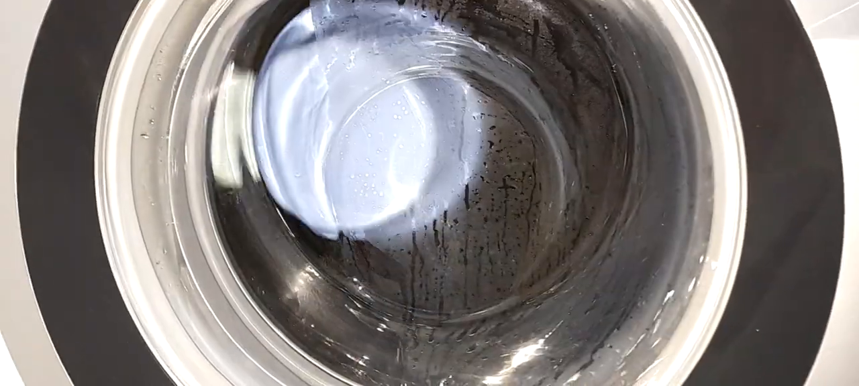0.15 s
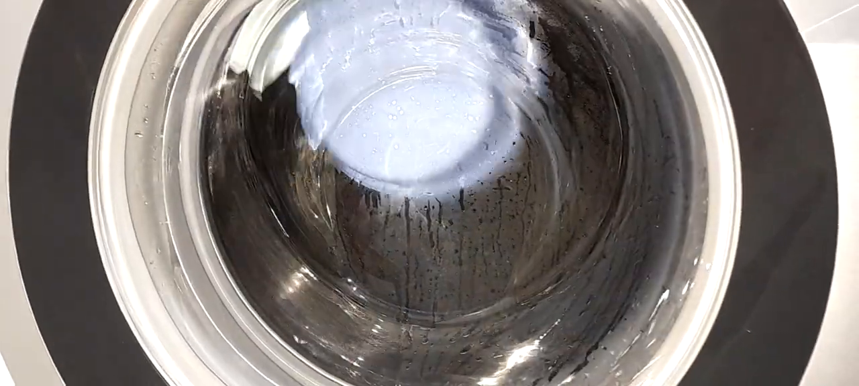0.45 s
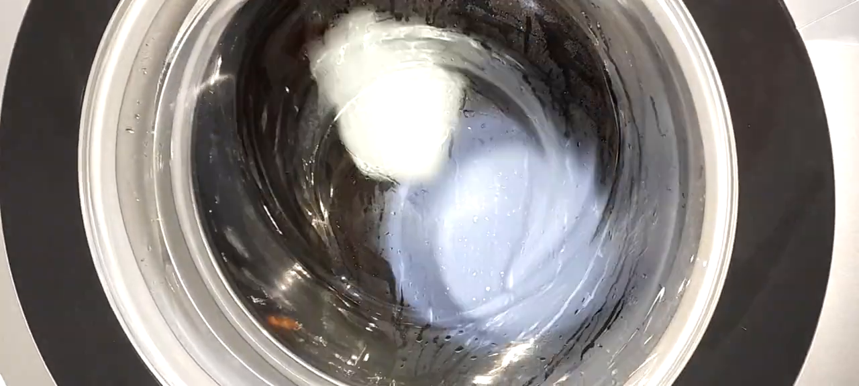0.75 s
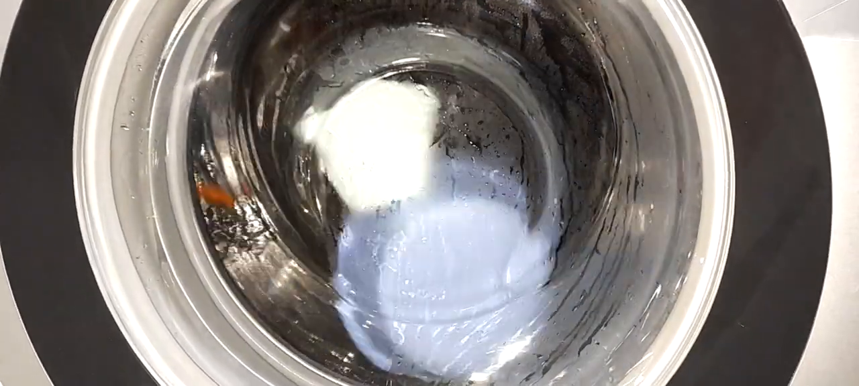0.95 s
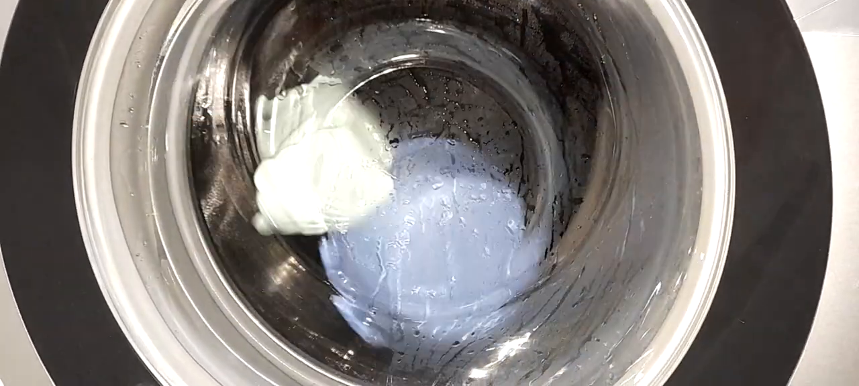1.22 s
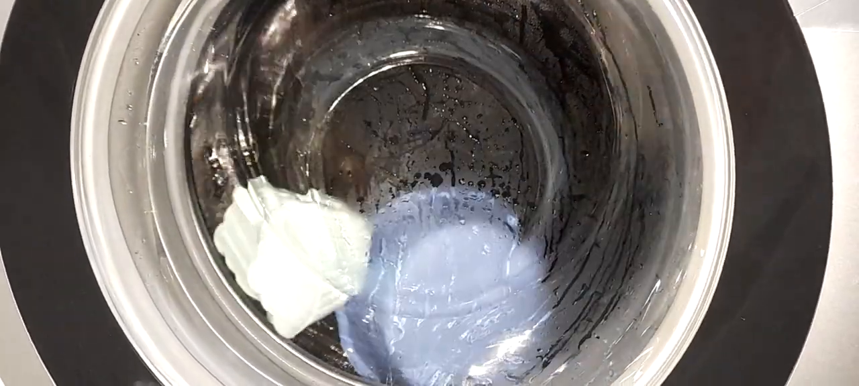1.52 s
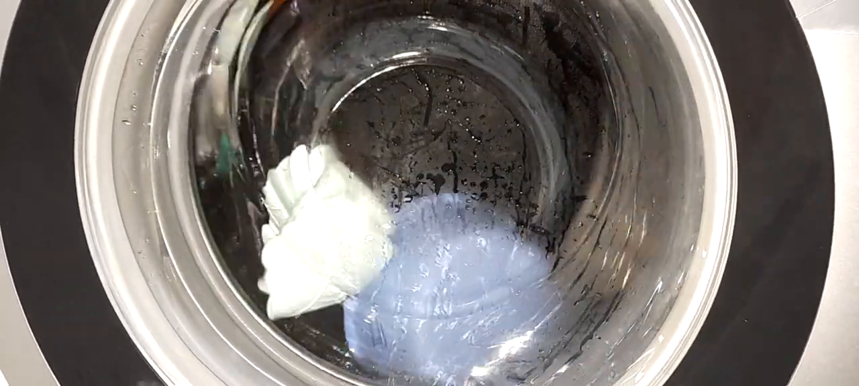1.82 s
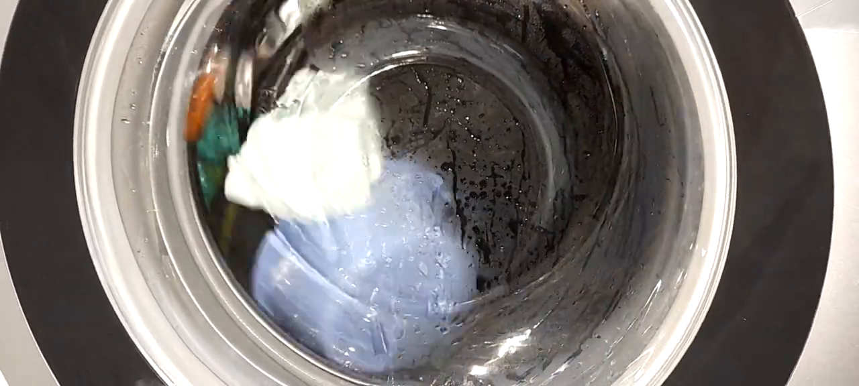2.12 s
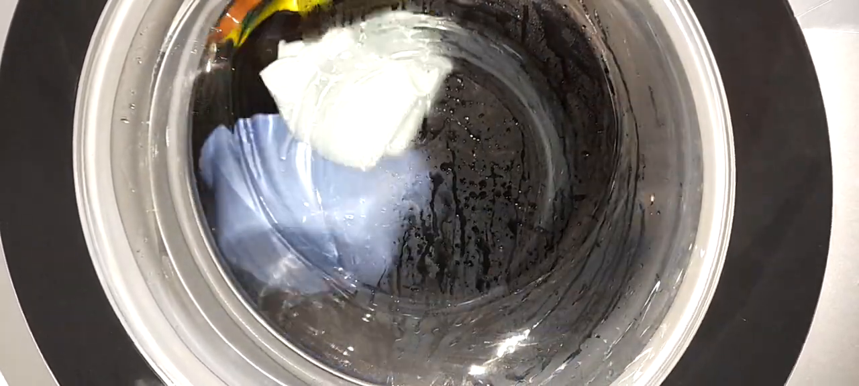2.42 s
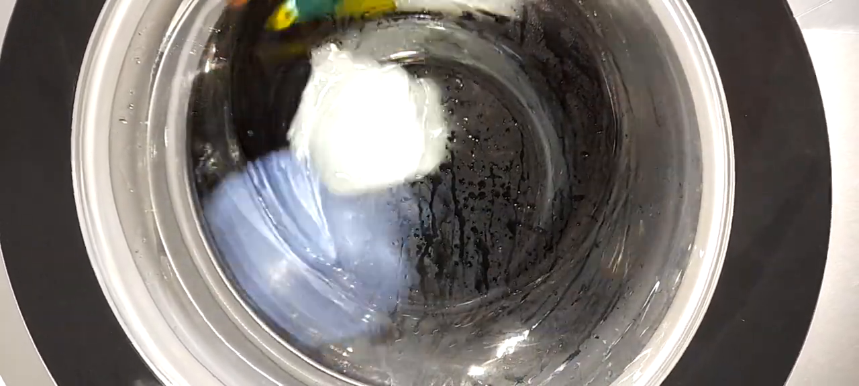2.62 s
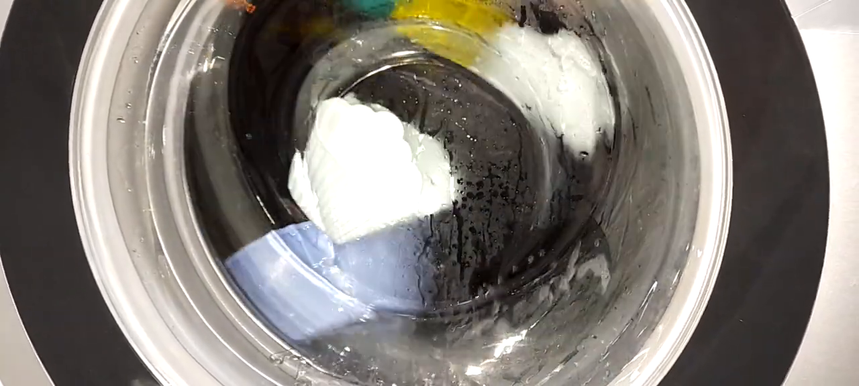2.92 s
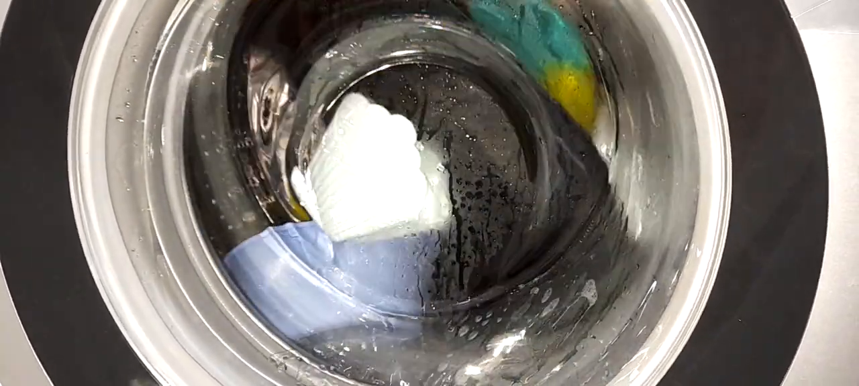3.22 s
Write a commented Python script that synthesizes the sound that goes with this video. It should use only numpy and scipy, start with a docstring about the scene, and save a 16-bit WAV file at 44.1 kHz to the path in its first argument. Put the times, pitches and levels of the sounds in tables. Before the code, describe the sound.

A front-loading washing machine drum turns a heavy wet load, rumbling unevenly with low thumps, wet slaps and sharp hard knocks; small ticks and one short squeak follow, heard close to the door in a small hard room.

```python
"""A washing machine drum turns slowly with a hard, wet load, heard close to the door in a small hard room.
Throughout, the rolling load drives panels and drum as shaped noise, with faint motor hiss and a thin whine.
From the start, bumps ring decaying sines and noise; from 0.13 s small pieces tick as clicks on short modes;
from 0.22 s hard pieces knock as bursts of noise. At 2.05 s a blow sets a metal part ringing; at 2.25 s wet
rubbing squeaks, as overtones on a shaky pitch. The drum reaches the left microphone port first."""
import sys
import numpy as np
from scipy import signal
from scipy.fft import rfft, irfft, next_fast_len
from scipy.io import wavfile
from scipy.ndimage import map_coordinates

SR = 44100
rng = np.random.default_rng(int(sys.argv[2]) if len(sys.argv) > 2 else 0)


def to_wav(sig):
    """Store sig (one row per channel, or 1-D mono) as 16-bit WAV at the path in sys.argv[1].

    Samples outside -1..1 are clipped; the rate is SR.
    """
    pcm = np.clip(np.atleast_2d(sig), -1, 1) * 32767
    pcm = np.round(pcm).astype(np.int16)
    wavfile.write(sys.argv[1], SR, pcm.T)  # frames by channels


N = 147735

# resonances of the drum's body: (centre [Hz], width [Hz], relative level [dB])
DRUM_BODY = [(267, 41.6, 1), (296, 32.2, 4), (341.7, 38.4, -1.5), (455.5, 21.2, 1.5), (524.7, 30, -2.5),
             (708, 110, -9.5)]


def amp(db):
    """Level definition: decibels to amplitude gain."""
    return 10 ** (np.asarray(db) / 20)


def along(points, hz):
    """Logarithmic frequency scale: interpolates (frequency [Hz], value) points on it."""
    f, v = np.transpose(points)
    return np.interp(np.log(hz + 1), np.log(f + 1), v)


def wobble(rate):
    """Band-limited random modulation: a smooth curve through `rate` random knots a second."""
    knots = rng.standard_normal(int(N * rate / SR) + 4)
    return map_coordinates(knots, [np.arange(N) * rate / SR])


def filtered(x, response):
    """Convolution theorem: filtering is a product of spectrum and complex response."""
    m = next_fast_len(N + SR // 2)
    spectrum = rfft(x, m) * response(np.fft.rfftfreq(m, 1 / SR))
    return irfft(spectrum, m)[..., :N]


def resonances(peaks):
    """Modal superposition: damped second-order resonators, summed with alternating sign."""
    def response(f):
        total = 0
        for k, (centre, width, db) in enumerate(peaks):
            mode = 1j * f * width / (centre * centre - f * f + 1j * f * width)
            total = total + (-1) ** k * amp(db) * mode
        return total
    return response


def spectrum_of(points):
    """Spectral envelope: a gain response through (frequency [Hz], relative level [dB per Hz]) points."""
    return lambda f: amp(along(points, f))


def through(envelope, response):
    """Partial coherence: mid and side noise share the power, so left and right are only partly alike."""
    # left-right likeness of the noise: (frequency [Hz], correlation [1])
    likeness = [(100, 0.89), (300, 1), (700, 1), (2000, 0.22), (8000, 0.18)]

    def mid_side(f):
        angle = np.arccos(np.clip(along(likeness, f), 0, 1)) / 2
        return response(f) * [np.cos(angle), np.sin(angle)]

    # the response is scaled to rms 1, so that the envelope alone sets the level
    gain = np.sqrt(np.mean(np.abs(response(np.linspace(0, SR / 2, SR // 2))) ** 2))
    mid, side = filtered(envelope * rng.standard_normal((2, N)), mid_side)
    return np.array([mid + side, mid - side]) / gain


def bursts(times, levels_db, t60s, attack_s):
    """Exponential decay: contacts rise fast and fall evenly in dB; overlapping ones add in power."""
    power, t = np.zeros(N + SR), np.arange(SR // 2) / SR
    for s, db, t60 in zip(times, levels_db, t60s):
        envelope = amp(db - 60 * t / max(t60, .003)) * (1 - np.exp(-t / attack_s))
        power[round(s * SR):][:len(t)] += envelope ** 2
    return np.sqrt(power[:N])


def rings(times, levels_db, modes):
    """Free vibration: every blow starts the damped modes anew, and each flutters as it dies."""
    flutter_share, flutter_rate, rise_s = .8, 350, .0006  # share [1], knots per s, swell of a ring [s]
    out, t = np.zeros(N + SR), np.arange(SR // 3) / SR
    for hz, level, t60 in modes:
        flutter = 1 + flutter_share * np.tanh(wobble(flutter_rate))
        for s, db in zip(times, levels_db):
            start = round(s * SR)
            decay = amp(db + level - 60 * t / t60) * np.tanh(t / rise_s)
            tone = decay * np.sin(2 * np.pi * hz * t)
            out[start:][:len(t)] += tone * np.resize(flutter[start:], len(t))
    return out[:N]


def thuds(times, levels_db, pitches_hz, t60s, attack_s):
    """Local resonance: each soft blow rings at the pitch of the spot that it hits."""
    out, t = np.zeros(N + SR), np.arange(SR // 2) / SR
    for s, db, hz, t60 in zip(times, levels_db, pitches_hz, t60s):
        envelope = amp(db - 60 * t / t60) * (1 - np.exp(-t / attack_s))
        out[round(s * SR):][:len(t)] += envelope * np.sin(2 * np.pi * hz * t)
    return out[:N]


def room(x):
    """Diffuse reverberation: convolution with noise tails in which each frequency dies at its own speed."""
    # reverberation time of the small hard room: (frequency [Hz], t60 [s])
    reverberation = [(100, 0.49), (1500, 0.21), (14000, 0.14)]
    # reverberant over direct sound, before the gain of each source: (frequency [Hz], level [dB])
    wetness = [(100, -22.5), (500, -6), (2000, -1.5), (8000, -3.5)]
    out, step = np.zeros((2, N + 2 * SR)), SR // 10
    # a new tail fades in every tenth of a second; squared, the overlapping fades add up to 1
    fade = np.sin(np.pi * np.arange(2 * step) / (2 * step))
    x = np.pad(x, (step, 2 * step))
    for start in range(0, N + step, step):
        hz, t, z = signal.stft(rng.standard_normal((2, SR // 3)), SR, nperseg=256)
        decay = amp(-60 * t / along(reverberation, hz)[:, None])
        decay = decay / np.sqrt(np.sum(decay ** 2, axis=1, keepdims=True) * 128)
        shape = decay * amp(along(wetness, hz))[:, None]
        tail = signal.istft(z * shape, SR, nperseg=256)[1]
        wet = signal.fftconvolve(fade * x[None, start:start + 2 * step], tail, axes=1)
        out[:, start + 90:][:, :wet.shape[1]] += wet  # 90 samples after the direct sound
    return out[:, step:step + N]


def whine():
    """Tonal radiation of the motor drive: thin sines with slow random modulation of level and phase."""
    # (frequency [Hz], mean level [dB])
    drive_tones = [(14300, -82)]
    t, out = np.arange(N) / SR, 0
    for hz, db in drive_tones:
        out = out + amp(db + 2 * wobble(8)) * np.sin(2 * np.pi * hz * t + 1.5 * wobble(40))
    return out


def rolling():
    """Forced vibration: the rolling load drives panels, drum and rattle as noise; the motor hisses too."""
    # mean levels: (time [s], boom [dB], drum's body [dB], rattle [dB], hiss [dB])
    roll_levels = [(0.0, -34, -41, -40, -56), (0.23, -39, -26, -42, -58), (0.41, -34.5, -36, -33.5, -48.5),
                   (0.56, -43.5, -32.5, -34.5, -50), (0.7, -38, -33, -40, -58.5),
                   (0.85, -45, -47.5, -47.5, -56.5), (1.09, -40.5, -32, -42.5, -61),
                   (1.21, -41, -28.5, -28.5, -48), (1.33, -36, -31.5, -36, -51.5),
                   (1.5, -28.5, -31, -37.5, -50), (1.63, -44, -35, -39, -60),
                   (1.84, -39, -39, -39.5, -55.5), (2.02, -36.5, -30.5, -45, -57.5),
                   (2.11, -46, -34.5, -33.5, -45.5), (2.22, -44.5, -37.5, -43.5, -59),
                   (2.342, -46, -44, -46, -55), (2.52, -37, -42, -43.5, -60),
                   (2.75, -30.5, -28, -36.5, -54), (2.83, -31, -32.5, -44, -56.5),
                   (2.99, -38, -38, -46.5, -63.5), (3.18, -44, -40, -49.5, -63),
                   (3.35, -37, -18.5, -35, -55.5)]
    # cabinet panels: (centre [Hz], width [Hz], relative level [dB])
    panels = [(74, 14.3, -1), (111, 11, -2.5), (132.8, 5.5, 1.5), (183.4, 5.9, -3.5)]
    # spectrum of the rattle: (frequency [Hz], relative level [dB per Hz])
    rattle_shape = [(320, -30), (550, -4), (699, -3.5), (1480, -9.5), (1580, -12), (2230, -15.5),
                    (3500, -37), (4550, -60), (7700, -120)]
    # spectrum of the hiss: (frequency [Hz], relative level [dB per Hz])
    hiss_shape = [(1470, -21), (2500, -26.5), (2640, -2), (3370, -11), (3730, -9), (5870, -15),
                  (6530, -13.5), (8160, -26), (13900, -23.5), (15700, -41)]
    s, boom_db, body_db, rattle_db, hiss_db = np.transpose(roll_levels)

    def uneven(db, depth_db, rate):
        return amp(np.interp(np.arange(N) / SR, s, db) + depth_db * np.tanh(wobble(rate)))

    boom = through(uneven(boom_db, 4, 25.43), resonances(panels))
    body = through(uneven(body_db, 1.5, 40), resonances(DRUM_BODY))
    rattle = through(uneven(rattle_db, 2.9, 90), spectrum_of(rattle_shape))
    hiss = through(uneven(hiss_db, 1, 66), spectrum_of(hiss_shape))
    return boom + body + rattle + hiss


def squeak():
    """Friction-excited vibration: wet rubbing sounds smeared overtones and sets resonances hissing."""
    # path of the squeak: (time [s], mean pitch [Hz], level [dB])
    squeak_path = [(2.246, 2035, -63), (2.252, 1862, -44), (2.265, 2014, -60), (2.276, 2198, -41),
                   (2.287, 1970, -58.5), (2.308, 1950, -44), (2.33, 2125, -46), (2.338, 2305, -53),
                   (2.349, 2520, -46), (2.358, 2130, -49), (2.369, 1900, -65)]
    # overtones: (multiple of the pitch [1], relative level [dB])
    overtones = [(1, 1), (2, -1), (3, -9)]
    # resonances that the rubbing excites, each applied twice: (centre [Hz], width [Hz], level [dB])
    rubbed_modes = [(1856, 60, 1.5), (2234, 97, 3), (5730, 98, -4), (6500, 340, -6), (11200, 900, -15)]
    pitch_scatter, smear_share, smear_rate = .02, .8, 400  # share [1], share [1], knots per s
    s, hz, db = np.transpose(squeak_path)
    t = np.arange(N) / SR
    pitch = np.interp(t, s, hz) * (1 + pitch_scatter * wobble(250))
    turns = np.cumsum(pitch) / SR
    gate = np.interp(t, [s[0] - .006, s[0], s[-1], s[-1] + .01], [0, 1, 1, 0])
    tones = 0
    for k, level in overtones:
        smear = .5 + smear_share * wobble(smear_rate)
        tones = tones + amp(level) * smear * np.sin(2 * np.pi * k * turns)
    rub_envelope = gate * amp(-45 + 3.3 * wobble(59.75))
    rubbing = through(rub_envelope, lambda f: resonances(rubbed_modes)(f) ** 2)
    return gate * amp(np.interp(t, s, db)) * tones + rubbing


def ticks():
    """Impact excitation: a short click of noise on a small ringing part."""
    # (time [s], click before its trim [dB], ring of the lowest mode before its relative level [dB])
    tick_hits = [(0.1294, -66, -51), (0.666, -66, -41), (0.6732, -66, -39), (0.766, -47.5, -31),
                 (0.818, -54.5, -44), (0.9158, -59, -51), (0.9447, -59, -50), (2.694, -45, -33),
                 (3.1278, -58.5, -45)]
    # modes of the part; only a sharp click wakes the upper ones: (frequency [Hz], relative level [dB], t60 [s])
    tick_modes = [(2220, 4, .035), (3800, 1, .02), (5640, 2, .025), (7714, -11, .12)]
    s, click_db, ring_db = np.transpose(tick_hits)
    click_shape = [(1500, -46), (3000, 7), (15000, -12)]  # (frequency [Hz], relative level [dB per Hz])
    click = through(bursts(s, click_db + 12.5, 0 * s + 0.017, 0.0006), spectrum_of(click_shape))
    return click + rings(s, ring_db, tick_modes[:1]) + rings(s, click_db, tick_modes[1:])


def clack():
    """Modal decay: one blow sets a metal part ringing."""
    # the blow: (time [s], level [dB])
    blow = [(2.046, -23)]
    # modes of the metal part: (frequency [Hz], relative level [dB], t60 [s])
    metal_modes = [(1448, -8, .2), (2600, 9, .04), (3690, 1, .025), (4800, -1, .02), (5647, -7, .2),
                   (5730, -11, .12), (6800, 0, .025)]
    return rings(*np.transpose(blow), metal_modes)


def knocks():
    """Broadband impact: hard pieces slap wet steel with a crack, a smack and a splash of noise."""
    # levels before their trims: (time [s], splash [dB], crack over splash [dB], splash t60 [s], smack [dB])
    knock_hits = [(0.221, -34.5, -12, 0.19, -35.5), (0.3748, -17, 8, 0.28, -21),
                  (1.1238, -19.5, 4, 0.26, -18.5), (1.27, -35, 6, 0.25, -49), (1.3907, -35, 4, 0.34, -52),
                  (1.8435, -29, -7, 0.32, -32), (2.0461, -14.5, 14.5, 0.2, -26.5),
                  (2.6253, -35.5, -19, 0.43, -39), (2.685, -27.5, -1, 0.14, -42),
                  (3.305, -63, 1, 0.22, -34)]
    # spectrum of the splash: (frequency [Hz], relative level [dB per Hz])
    splash_shape = [(1470, -11), (2500, 0), (2890, -7), (3790, -9.5), (6290, -10), (8160, -21.5),
                    (13400, -23.5), (15700, -101)]
    grain_db = 3  # unevenness of splash and smack
    s, splash_db, crack_db, t60, smack_db = np.transpose(knock_hits)
    splash_envelope = bursts(s, splash_db - 10.5, t60, 0.00036) * amp(grain_db * wobble(200))
    splash = through(splash_envelope, spectrum_of(splash_shape))
    # resonances of the smack, applied twice: (centre [Hz], width [Hz], level [dB])
    smack_modes = resonances([(1750, 500, 0), (2300, 700, -1)])
    smack_envelope = bursts(s, smack_db - 4, t60, 0.00035) * amp(grain_db * wobble(110))
    smack = through(smack_envelope, lambda f: smack_modes(f) ** 2)
    # spectrum of the crack: (frequency [Hz], relative level [dB per Hz])
    crack_shape = [(1200, -15), (2500, 4), (7000, -2.0), (8200, -10.5), (15000, -8)]
    crack_envelope = bursts(s, splash_db + crack_db - 13.0, 0 * s + .013, 0.0005)
    crack = through(crack_envelope, spectrum_of(crack_shape))
    return splash + smack + crack


def bumps():
    """Transient response: each bump of the load rings cabinet and drum, scrapes the body and slaps."""
    # levels before the trims below:
    # (time [s], boom [dB], boom [Hz], body [dB], body [Hz], slap [dB], length of the contact [s])
    bump_hits = [(0.027, -19.5, 80.4, -33, 279, -48.5, 0.016), (0.13, -21, 103, -46, 280, -42.5, 0.045),
                 (0.226, -43, 121, -17.5, 276.7, -29, 0.045), (0.254, -51, 183, -19.5, 282, -34.5, 0.019),
                 (0.372, -43, 164, -38, 500, -15, 0.018), (0.435, -26.5, 98.9, -29, 264.4, -25, 0.064),
                 (0.538, -34, 179, -19, 281, -40, 0.035), (0.583, -41, 134, -19, 268, -54, 0.01),
                 (0.66, -25.5, 100, -25, 314, -42.5, 0.022), (0.819, -26, 96, -26, 338, -41, 0.023),
                 (1.036, -31, 85, -29, 253, -37.5, 0.067), (1.124, -40, 90, -18.5, 284.5, -17, 0.033),
                 (1.199, -29, 133, -23.5, 448, -29, 0.0076), (1.386, -12.5, 98, -19, 318, -45, 0.0091),
                 (1.424, -16.5, 106.3, -17.5, 259.6, -35.5, 0.036),
                 (1.478, -46, 98, -24.5, 258, -32, 0.038), (1.529, -29, 147, -28, 496, -29, 0.012),
                 (1.785, -54, 114, -26.5, 257, -37, 0.017), (1.857, -25, 82, -31.5, 505, -32.5, 0.038),
                 (1.93, -32, 107, -29.5, 254, -50, 0.057), (2.005, -16.5, 105.6, -40, 283, -32.5, 0.068),
                 (2.045, -24, 103, -20.5, 276.5, -25, 0.017), (2.128, -27.5, 127.7, -24.5, 350, -27, 0.038),
                 (2.171, -45, 115, -21.5, 519.6, -48, 0.032), (2.453, -27, 140, -20.5, 385, -52, 0.0005),
                 (2.464, -17, 105, -44, 270, -59, 0.0067), (2.487, -28, 112.4, -26.5, 299, -60, 0.017),
                 (2.597, -16, 136, -10.5, 266, -35, 0.0039), (2.629, -16.5, 145, -17.5, 318, -26.5, 0.017),
                 (2.657, -26, 174, -10, 270, -22, 0.0034), (2.7, -13, 137, -15.5, 280, -38.5, 0.0038),
                 (2.737, -14, 106, -21.5, 344, -57, 0.013), (2.848, -28, 168, -25, 259, -38.5, 0.016),
                 (2.878, -25.5, 173, -26.5, 267.7, -40.5, 0.05), (3.008, -24, 97, -29.5, 263, -51, 0.014),
                 (3.151, -48, 69.6, -34.5, 307, -42, 0.1), (3.304, -36, 172, -21, 363, -23, 0.02),
                 (3.327, -28, 170, -22, 556, -19.5, 0.014)]
    # spectrum of the slap: (frequency [Hz], relative level [dB per Hz])
    slap_shape = [(350, -53), (600, 2), (907, 6.5), (1600, -1), (1760, -3), (1910, -7.5), (3500, -23),
                  (4550, -31.5), (7700, -120)]
    boom_trim_db, body_trim_db, scrape_trim_db = -2, 2, -2
    at, boom_db, boom_hz, body_db, body_hz, slap_db, length = np.transpose(bump_hits)
    fall_s = 6.4 * length  # each layer adds its own time to this for its t60
    boom = thuds(at, boom_db + boom_trim_db, boom_hz, fall_s + 0.063, 0.00097)
    body = thuds(at, body_db + body_trim_db, body_hz, fall_s + 0.032, 0.0022)
    scrape_envelope = bursts(at, body_db + scrape_trim_db, fall_s + 0.065, 0.0051)
    scrape = through(scrape_envelope, resonances(DRUM_BODY))
    slap = through(bursts(at, slap_db, fall_s + 0.1, 0.00034), spectrum_of(slap_shape))
    return boom + body + scrape + slap


def at_ports(x, lead_s, room_gain):
    """Interchannel time and level difference: direct sound and room reach the left port earlier."""
    # left over right: (frequency [Hz], level [dB])
    left_over_right = [(100, 1), (380, -3), (700, 1), (2400, -2.5), (9000, 1)]
    side = np.array([[.5], [-.5]])  # half of each difference goes to either port

    def port_response(f):
        return np.exp(2j * np.pi * f * lead_s * side) * amp(along(left_over_right, f) * side)

    return filtered(x + room_gain * room(x.mean(axis=0)), port_response)


def scene():
    """Superposition: the drum a little to the left and the small parts nearly straight ahead, each direct and
    through the room."""
    drum = rolling() + knocks() + bumps()
    small = whine() + squeak() + ticks() + clack()
    # the small parts near the door stir the room less
    return at_ports(drum, lead_s=.00027, room_gain=0.98) + at_ports(small, lead_s=.00002, room_gain=amp(-4))


def record(dry):
    """Band limitation: the microphone loses the deepest bass, and nothing sounds above 15840 Hz."""
    low_hz, top_hz = 56, 15840
    return filtered(dry, lambda hz: (1j * hz / (low_hz + 1j * hz)) ** 2 * (hz < top_hz))


dry = scene()
out = record(dry)
to_wav(out)
```